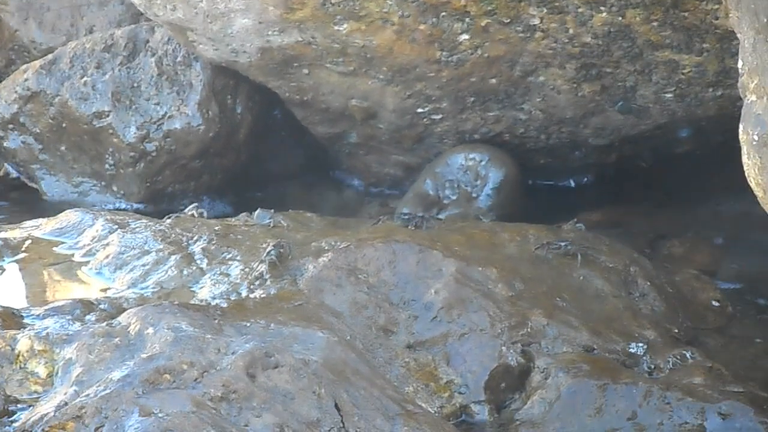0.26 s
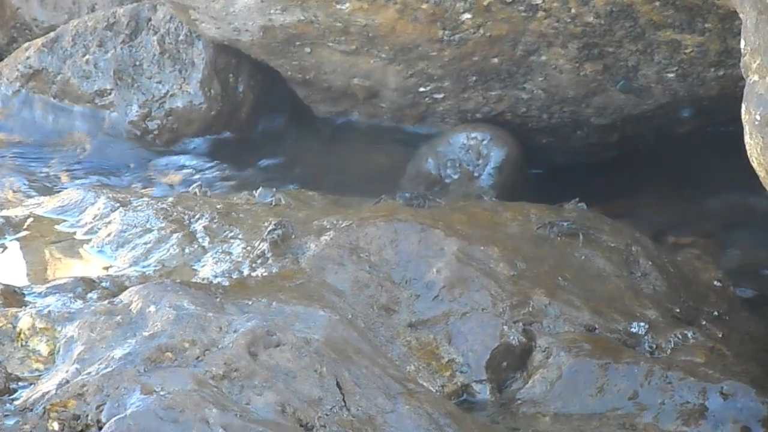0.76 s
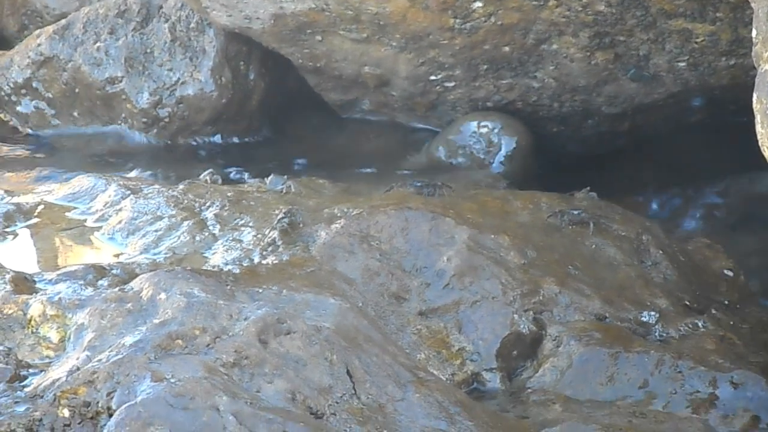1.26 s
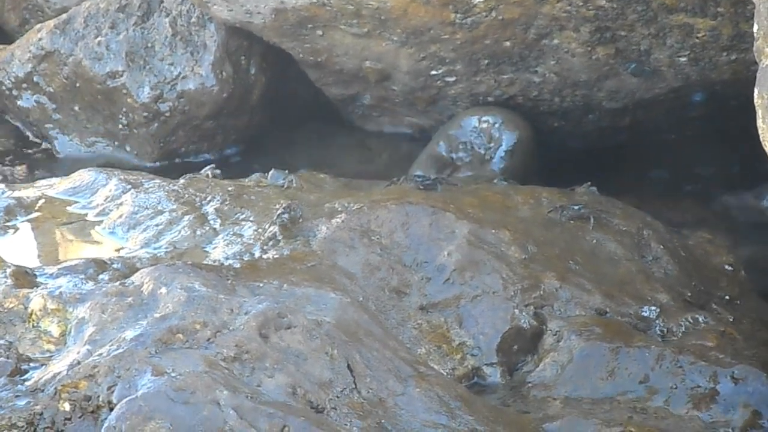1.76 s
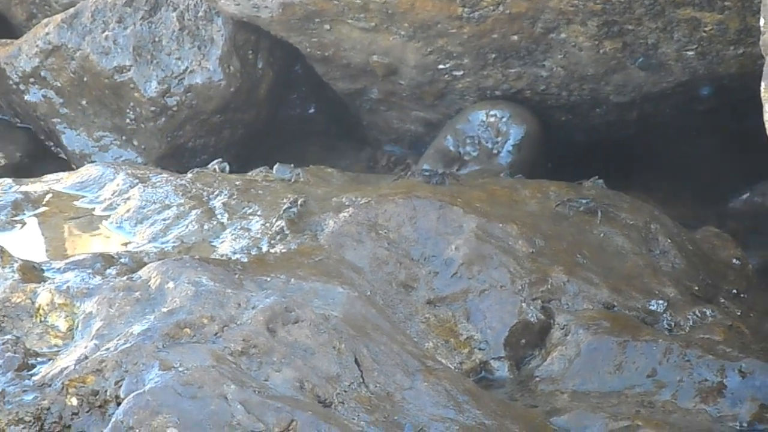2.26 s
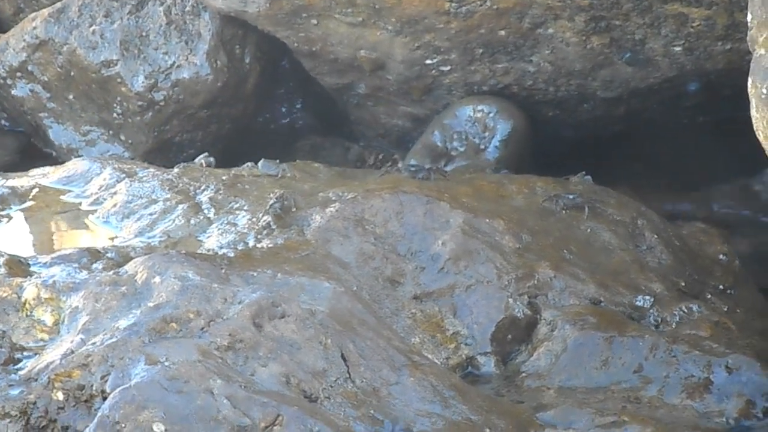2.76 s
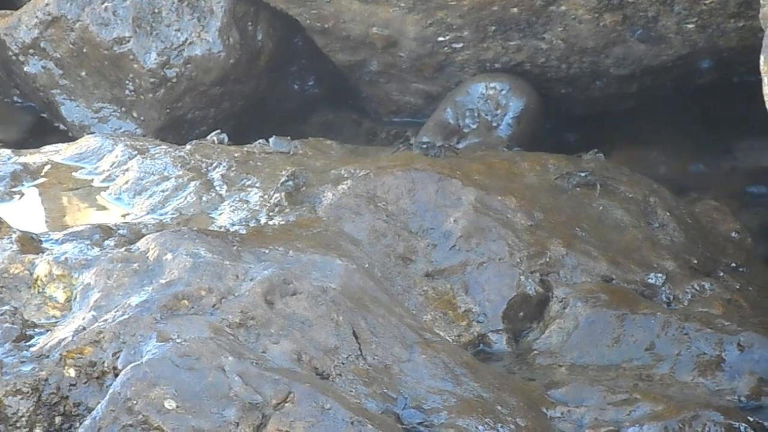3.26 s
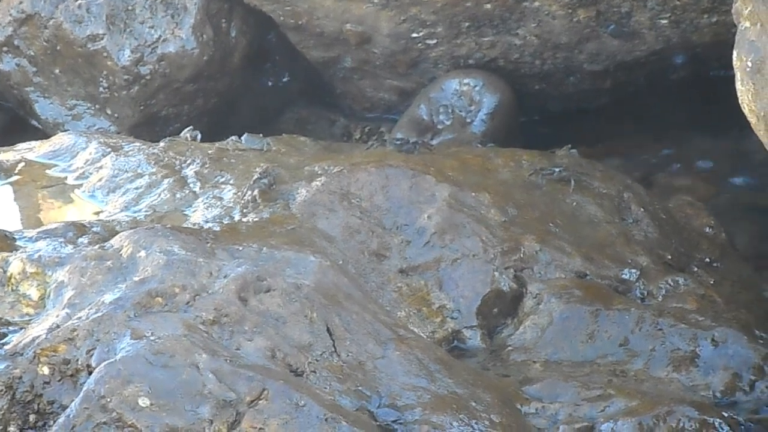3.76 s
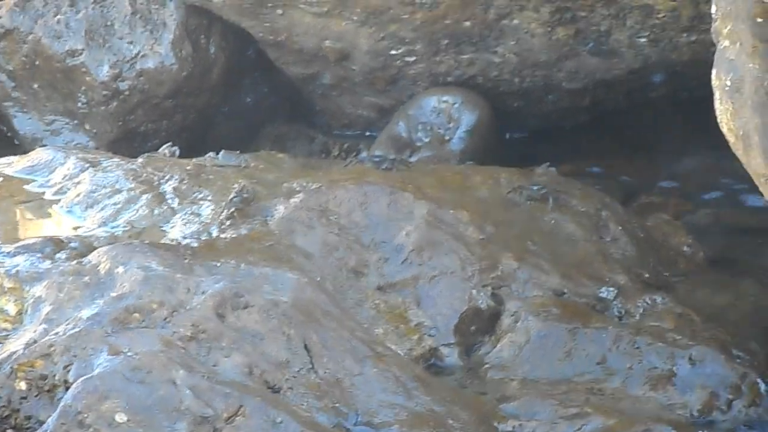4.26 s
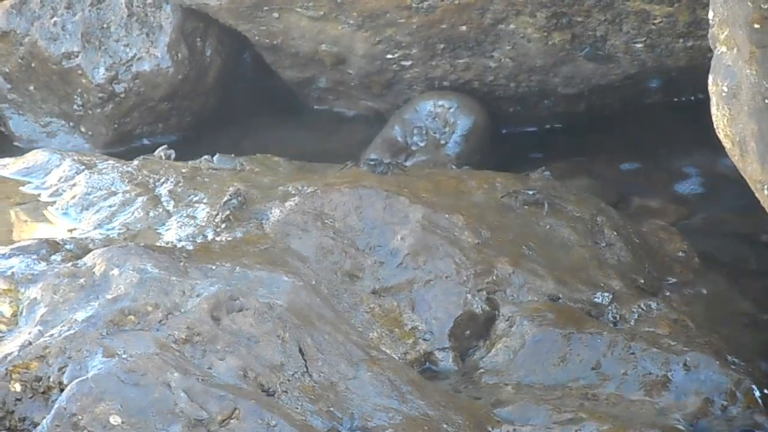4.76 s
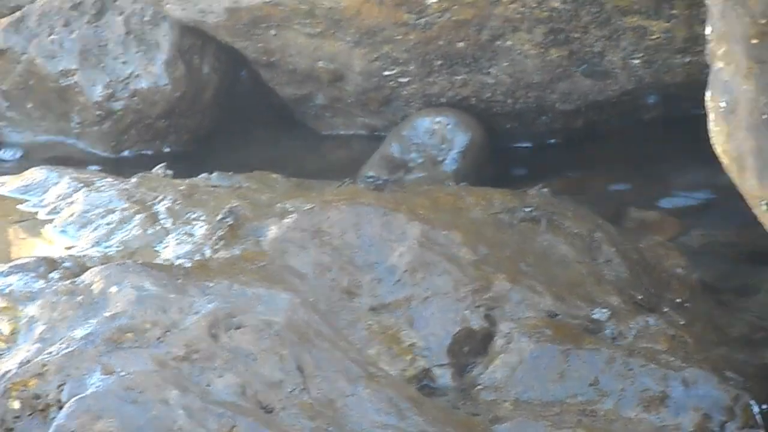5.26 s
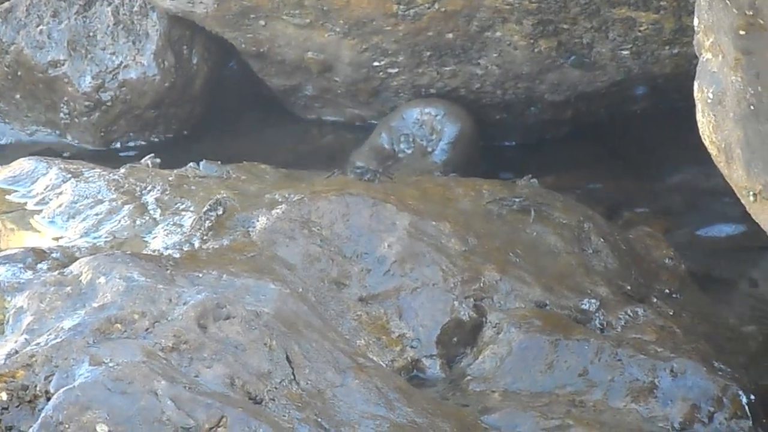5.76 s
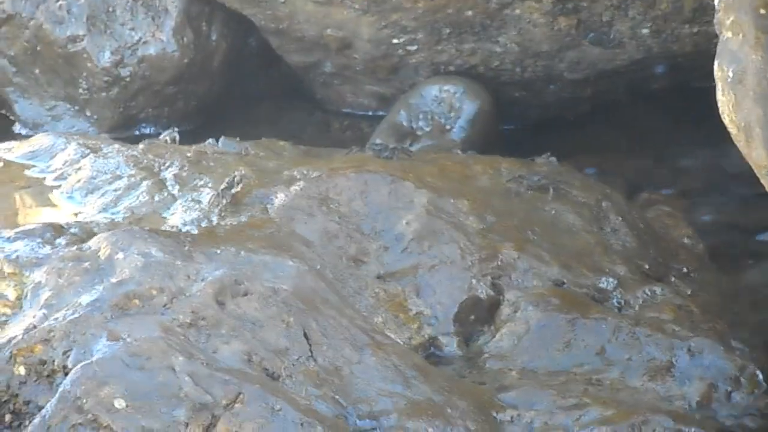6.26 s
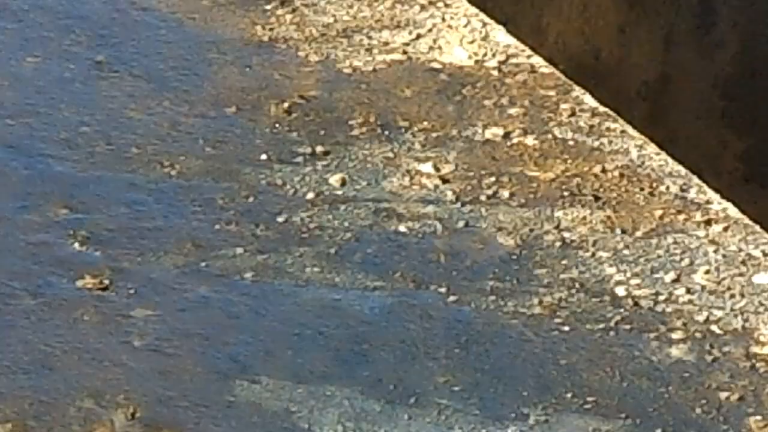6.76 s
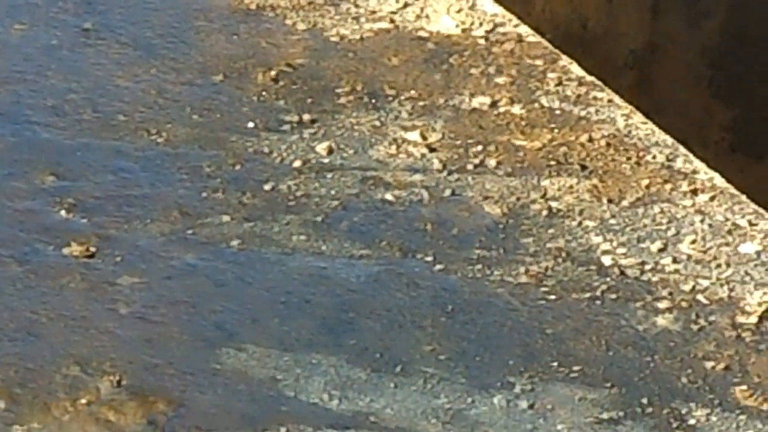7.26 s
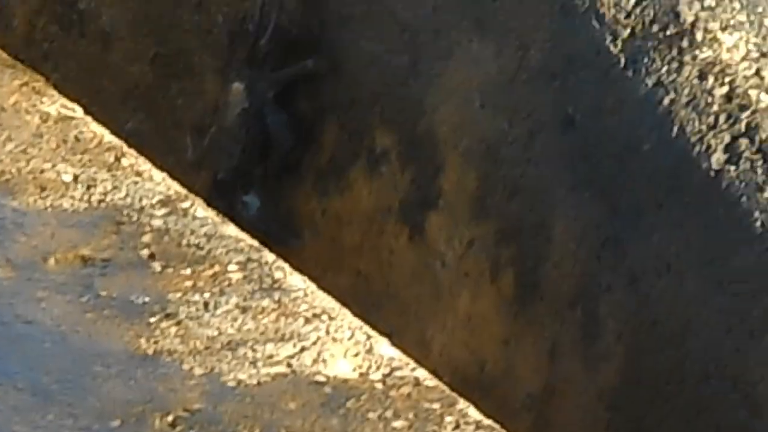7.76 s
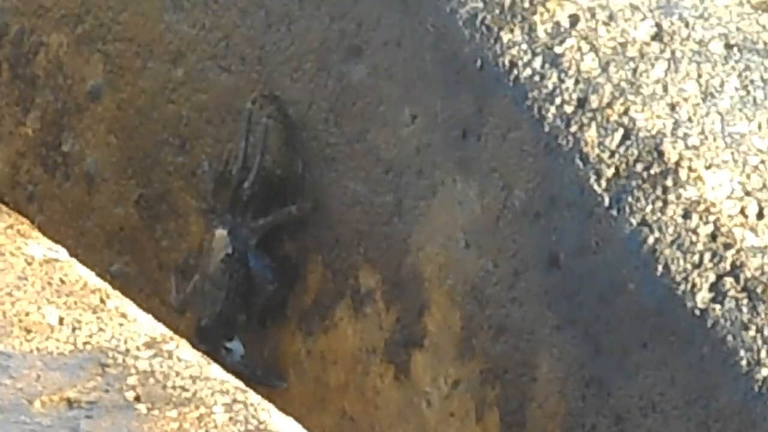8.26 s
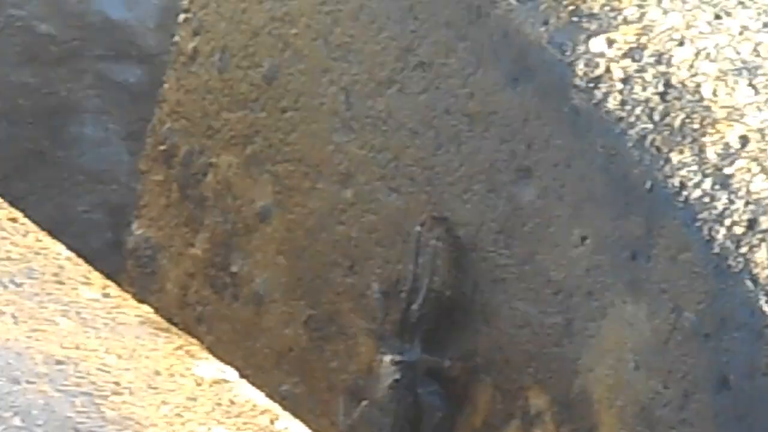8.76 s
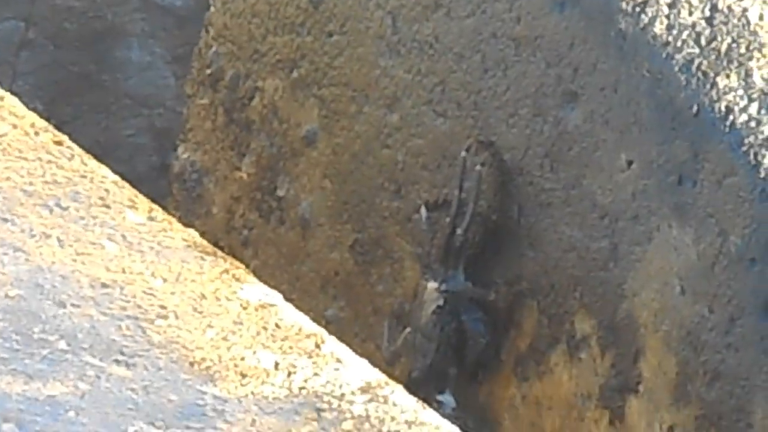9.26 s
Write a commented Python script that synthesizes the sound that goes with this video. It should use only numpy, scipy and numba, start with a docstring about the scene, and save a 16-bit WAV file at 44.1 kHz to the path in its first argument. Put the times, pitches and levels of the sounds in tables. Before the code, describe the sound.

Small sea waves among shoreline rocks, heard close up in mono, with short stony echoes and a soft rolled-off top. At 0 s a wave is ebbing from a gap between boulders: foamy, bubbling wash that thins over two seconds to a quiet trickle. Bright drips cluster at 1.0-1.3 s and near 1.9 s; hollow gulps plop at 2.3 s and repeatedly from 2.8 to 4.0 s over small surges. Wavelets slap the rock around 4.4-4.6 s, then from about 4.7 s a swell fills the gap with rounder, deeper gurgling, with strong plops at 5.8-6.3 s. At 6.84 s the sound dips almost to silence for a moment. A louder, denser, brighter rush over a stone slab follows, lapping unevenly, with crisp slaps around 7.2-7.8 s, sharp drips at 8.3 s, a big plop at 8.5 s and tumbling water towards 9.5 s. A low rumble and faint drone lie behind.

```python
"""Small sea waves wash a rocky shore: water drains and gurgles in a gap between boulders, then a swell fills it.
After a brief dip in level a louder wash runs over a stone slab.
The water is a swarm of ringing air bubbles over fine foam noise; single bubbles plop, wavelets slap, drops spatter.
Close rock faces echo the plops and slaps; a low rumble and a faint far drone lie behind.
Mono, as at a single microphone: both channels are the same."""
import sys
import numpy as np
from scipy import signal
from scipy.fft import rfft, irfft, next_fast_len
from scipy.io import wavfile
from numba import njit

SR = 44100
rng = np.random.default_rng(int(sys.argv[2]) if len(sys.argv) > 2 else 0)


def wrap_up_sound(samples):
    """Save the sound to the file named by the first command line argument, as 16-bit audio."""
    columns = np.atleast_2d(samples).T
    # keep every value between -1 and 1, then stretch to whole-number steps
    tamed = np.clip(columns, -1, 1)
    steps = np.round(tamed * 32767).astype(np.int16)
    wavfile.write(sys.argv[1], SR, steps)


N = 419391
TIME = np.arange(N) / SR
BREAK_S, BREAK_HALF_S = 6.842, .04   # the dip between gap and slab: centre and half length


def from_db(db):
    """Decibels to gain."""
    return 10 ** (np.asarray(db) / 20)


def rms_one(x):
    """Scale to rms 1."""
    return x / np.sqrt(np.mean(x ** 2) + 1e-20)


def add(out, s, sound):
    """Mix a sound in, starting at s seconds."""
    at = max(round(s * SR), 0)
    out[at:at + len(sound)] += sound[:max(N - at, 0)]


def cut(x, hz, kind, order=2):
    """Butterworth low- or high-pass."""
    return signal.sosfilt(signal.butter(order, min(hz, .45 * SR), kind, fs=SR, output="sos"), x)


def band(water, low_hz, high_hz):
    """Up to half a second of water noise from a random moment, between two edges."""
    piece = water[rng.integers(N // 2):][:SR // 2]
    return cut(cut(piece, low_hz, "high", order=4), high_hz, "low", order=4)


def colour(x, points):
    """Give a white sound a spectrum with a causal minimum-phase filter; rms 1."""
    hz, db = np.transpose(points)
    size = next_fast_len(N)
    grid = np.maximum(np.abs(np.fft.fftfreq(size, 1 / SR)), 1)
    log_gain = np.log(from_db(np.interp(np.log(grid), np.log(hz), db)))
    response = np.exp(np.conj(signal.hilbert(log_gain)))[:size // 2 + 1]
    return rms_one(irfft(rfft(x, size) * response, size)[:N])


def drift(rate):
    """Smooth random wandering with spread 1: noise below about rate Hz, drawn at every 40th sample."""
    r = np.exp(-80 * np.pi * rate / SR)
    noise = rng.standard_normal(N // 40 + 2002)
    slow = signal.lfilter([1], [1, -2 * r, r * r], noise)[2000:]   # drop the filter's settling
    return np.interp(np.arange(N) / 40, np.arange(len(slow)), rms_one(slow))


def pops(per_s, spread_db):
    """Clicks at random moments, many small and a few large; rms 1."""
    when, force, sign = rng.random((40000, 3))[:int(per_s * N / SR) + 1].T
    sizes = from_db(spread_db * np.minimum(-np.log(force), 4)) * np.sign(sign - .5)
    return rms_one(np.bincount((when * N).astype(int), sizes, N))


@njit
def ring(rows, rise):
    """Each bubble (s, Hz, gain, cycles to -60 dB) is a dying sine whose pitch rises as it nears the surface."""
    out = np.zeros(N)
    for s, hz, gain, cycles in rows:
        at = int(s * SR)
        length = int(SR * cycles / hz) + 1
        angle = 2 * np.pi * hz / SR
        swing = gain + 0j
        step = np.exp(1j * angle - np.log(1000) / length)
        glide = np.exp(2j * angle * rise / length)   # the pitch ends up by twice the share "rise"
        for i in range(min(length, N - at)):
            out[at + i] += swing.imag * min(i * angle / np.pi, 1.)   # the first half cycle builds up
            swing *= step
            step *= glide
    return out


def rocks(x, echo_db, t60=0.092, dull_hz=6000):
    """Close stone faces scatter a short, duller tail after a sound; every call draws its own echoes."""
    t = TIME[:SR // 5]
    tail = cut(rng.standard_normal(len(t)), dull_hz, "low", order=1)
    tail = tail * from_db(-60 * t / t60) * (t > .002)
    return x + from_db(echo_db) * signal.fftconvolve(x, tail / np.linalg.norm(tail))[:len(x)]


# Low rumble of the open shore: (frequency [Hz], relative level [dB per Hz])
RUMBLE_COLOUR = [(20, -27), (35, -17.5), (60, -8.5), (110, -6.5), (200, -5), (400, -18)]
# Faint far drone: (frequency [Hz], level [dB rms])
DRONE_TONES = [(91.5, -65), (137.5, -65), (229, -60.5)]


def shore(rumble_db=-58, thump_db=-4, waver=0.37):
    """Coloured noise rumbles unevenly, low-passed clicks thump under the boulders, sines waver in phase (rad)."""
    lumps_db = 1.8 * drift(7)
    thumps = from_db(thump_db) * cut(pops(per_s=12, spread_db=3.0), 160, "low")
    ground = cut(rng.standard_normal(N), 400, "low") + thumps
    out = colour(ground, RUMBLE_COLOUR) * from_db(rumble_db + lumps_db)
    for hz, db in DRONE_TONES:
        phase = 2 * np.pi * hz * TIME + waver * drift(1.9)
        out = out + from_db(db) * np.sqrt(2) * np.sin(phase)
    return out


# Fainter random bubbles in the gap: (rate [per s], base level [dB], spread [dB],
# lowest pitch [Hz], highest pitch [Hz], ring until 60 dB down [cycles])
STRAY_BUBBLES = [(24, -31.5, 0.5, 2450, 6900, 54), (30.2, -32, 2, 697, 3150, 36)]


def strays(rise=0.074, echo_db=-6):
    """Small pips and middling plops ring at random in the gap, up to the dip."""
    rows = []
    for per_s, base_db, spread_db, low_hz, high_hz, cycles in STRAY_BUBBLES:
        for when, size, force in rng.random((500, 3))[:int(per_s * BREAK_S)]:
            hz = low_hz * (high_hz / low_hz) ** size
            gain = from_db(base_db + spread_db * (2 * force - 0.5))
            rows.append((when * BREAK_S, hz, gain, cycles))
    return rocks(ring(np.array(rows), rise), echo_db)


def plop(hz, cycles, rise=0.045, top_hz=9000, snap_db=-15, snap_s=.001, swell_cycles=1.0):
    """A bubble pinches off with a small snap, swells over about a cycle and rings out with rising pitch."""
    t = TIME[:SR // 5]
    tone = ring(np.array([[0., hz, 1., cycles]]), rise)[:len(t)]
    tone = tone * (1 - np.exp(-t * hz / swell_cycles))
    hiss = cut(rng.standard_normal(len(t)), hz / 2, "high")
    hiss = rms_one(cut(hiss, min(2 * hz, top_hz), "low", order=3))
    snap = from_db(snap_db) * min(hz / 3000, 1) * hiss * np.exp(-t / snap_s)   # low plops snap less
    return rocks(tone / np.abs(tone).max() + snap, echo_db=-7.5)


# Large air pockets gulping under the boulders: (time [s], peak of the bare tone [dB], starting pitch [Hz])
GULP_BUBBLES = [(0.086, -32, 225), (1.028, -27, 1040), (1.122, -25, 755), (1.86, -31, 644),
                (2.265, -22, 624), (2.766, -25.5, 1050), (2.78, -29, 530), (2.899, -24, 1210),
                (2.946, -24, 730), (3.284, -27, 740), (3.375, -27, 1240), (3.461, -27, 690),
                (3.588, -27, 900), (4.003, -27, 536), (4.016, -21, 793), (5.82, -22, 640),
                (6.039, -18, 994), (6.249, -20, 1210), (8.505, -13.5, 974)]
# Drops that fall into the pool and trap a small bubble: (time [s], peak of the bare tone [dB], starting pitch [Hz])
DRIP_BUBBLES = [(0.334, -16, 2660), (1.066, -21, 4760), (1.103, -23.5, 3440), (1.1443, -15, 6050),
                (1.214, -22, 2370), (1.218, -19.5, 2650), (1.231, -25, 2620), (1.251, -23, 2070),
                (1.853, -20, 2040), (1.886, -22, 3820), (1.991, -25.5, 1870), (2.901, -22, 2220),
                (2.971, -22, 1700), (3.701, -27, 4100), (4.013, -20, 3560), (4.366, -16.5, 1750),
                (4.615, -17, 1720), (4.8703, -22, 2530), (4.873, -18.5, 3070), (5.339, -17, 3520),
                (8.28, -12.5, 4460), (8.345, -10, 6200)]
GULP_CYCLES, DRIP_CYCLES = 29, 29   # ring until 60 dB down


def plops():
    """Deep gulps and bright drips, each one ringing bubble."""
    out = np.zeros(N)
    for s, peak_db, hz in GULP_BUBBLES:
        add(out, s, from_db(peak_db) * plop(hz, GULP_CYCLES))
    for s, peak_db, hz in DRIP_BUBBLES:
        add(out, s, from_db(peak_db) * plop(hz, DRIP_CYCLES))
    return out


def swarm(per_s, spread_db, cycles, rise, clump_db, clump_s=.012, count=8):
    """Each ripple traps a clump of bubbles of like size; gain grows with pitch to keep the whole near white; rms 1."""
    chance = rng.random((int(per_s / count * N / SR), count + 1, 5))
    when, size, vigour = np.repeat(chance[:, 0, :3], count, axis=0).T   # shared within a clump
    delay, detune, force, life, sign = chance[:, 1:].reshape(-1, 5).T   # one per bubble
    low_root, high_root = np.sqrt(130), np.sqrt(11500)
    clump_hz = (low_root + size * (high_root - low_root)) ** 2
    hz = clump_hz * 2 ** (detune - .5)
    level_db = spread_db * np.minimum(-np.log(force), 4) + clump_db * np.minimum(-np.log(vigour), 3)
    gain = hz ** .75 * from_db(level_db) * np.sign(sign - .5)
    born = when * N / SR - abs(clump_s) * np.log(delay)
    lasts = cycles * (.5 + life) * (hz / 1000) ** 0.26   # small bubbles ring for more cycles
    return rms_one(ring(np.column_stack([born, hz, gain, lasts]), rise))


def burst(water, level_db, length, attack_share=0.17):
    """Water noise that swells quickly and dies away over a decay time (s); the level is the crest's rms."""
    t = TIME[:SR // 3]
    envelope = (1 - np.exp(-t / (attack_share * length))) * np.exp(-t / length)
    return from_db(level_db) * rms_one(water[:len(t)] * envelope) / rms_one(envelope).max()


# Wavelets slapping the rock: (time [s], crest level before echo [dB], decay time [s], upper band edge [Hz])
ROCK_SLAPS = [(0.023, -32, 0.065, 4470), (1.852, -24, 0.0031, 4540), (1.879, -35.5, 0.046, 1690),
              (2.261, -30, 0.05, 2220), (2.803, -30, 0.014, 3400), (3.46, -26.5, 0.005, 6100),
              (3.995, -29, 0.028, 1900), (4.358, -29.5, 0.015, 6000), (4.53, -32.5, 0.06, 4000),
              (4.564, -24, 0.035, 4750), (4.607, -27, 0.015, 4700), (5.771, -27.5, 0.044, 1920),
              (5.82, -25, 0.014, 2200), (7.233, -24, 0.008, 4000), (7.478, -22, 0.012, 3800),
              (7.496, -16.5, 0.0045, 5000), (7.839, -21, 0.008, 3020)]
# Spray spattering on stone: (time [s], crest level before echo [dB], decay time [s], band centre [Hz])
STONE_SPATTERS = [(0.799, -30.5, 0.0074, 7400), (1.14, -27, 0.0061, 5100), (1.471, -28, 0.004, 6400),
                  (1.882, -24.5, 0.0043, 3340), (3.692, -34.5, 0.014, 4100), (3.991, -26.5, 0.007, 4880),
                  (4.222, -35, 0.0082, 7060), (4.703, -33, 0.045, 3840), (5.3375, -24.5, 0.0018, 5300),
                  (8.03, -19.5, 0.0022, 7400), (8.92, -17.5, 0.0047, 5500)]


def slaps(low_hz=430, spatter_width=1.03, foam_db=-3, drops_db=-5):
    """A wavelet hits stone and bursts into bubbles, foam and crisp drops; spray spatters in narrow bands."""
    out = np.zeros(N)
    bubbles = swarm(per_s=7100, spread_db=-3, cycles=25, rise=0.11, clump_db=-1)
    foam = from_db(foam_db) * rng.standard_normal(N)
    drops = from_db(drops_db) * pops(per_s=650, spread_db=2.5)
    splash = bubbles + foam + drops
    for s, level_db, length, bright_hz in ROCK_SLAPS:
        slap = burst(band(splash, low_hz, bright_hz), level_db, length)
        add(out, s, rocks(slap, echo_db=-6.5))
    for s, level_db, length, hz in STONE_SPATTERS:
        spatter = burst(band(splash, hz / spatter_width, hz * spatter_width), level_db, length)
        add(out, s, rocks(spatter, echo_db=-4.5))
    return out


# Water folding over in the wash: (crest time [s], crest level [dB] before the bell shape is applied,
# half length [s], band centre [Hz])
WASH_TUMBLES = [(0.057, -28.5, 0.046, 800), (0.408, -31.5, 0.038, 880), (6.68, -33, 0.053, 940),
                (6.908, -30.5, 0.028, 288), (7.772, -25, 0.027, 720), (7.85, -30.5, 0.022, 480),
                (7.983, -30.5, 0.034, 450), (8.87, -22.5, 0.025, 890), (9.346, -25, 0.025, 950),
                (9.46, -22.5, 0.022, 840), (9.466, -34, 0.018, 303)]


def tumbles(bubbles, width=1.23):
    """Water folds over and traps a cloud of bubbles of like size, which swells and fades as a bell curve."""
    out, t = np.zeros(N), TIME[:SR // 2]
    for s, level_db, length, hz in WASH_TUMBLES:
        start = max(s - t.mean(), 0)
        cloud = rms_one(band(bubbles, hz / width, hz * width))
        bell = np.exp(-.5 * ((start + t - s) / length) ** 2)
        add(out, start, from_db(level_db) * cloud * bell)
    return out


def droplets(per_s, spread_db, patchy_db=1.5, cycles=17, low_hz=2400, high_hz=10500, rise=0.15):
    """Falling droplets each trap a tiny bubble that pips for a few cycles; flurries swell and thin; rms 1."""
    when, size, force = rng.random((20000, 3))[:int(per_s * N / SR)].T
    hz = low_hz + size * (high_hz - low_hz)
    gain = hz ** .5 * from_db(spread_db * np.minimum(-np.log(force), 4))
    lasts = np.full(len(hz), 1. * cycles)
    pips = ring(np.column_stack([when * N / SR, hz, gain, lasts]), rise)
    return rms_one(pips * from_db(2 * patchy_db * np.tanh(drift(14) / 2)))


# The last wave ebbs out of the gap until only a trickle is left; spray levels are relative to churn.
# All flow levels here and in the two tables below are before the trims in waves().
EBB_DB, EBB_DB_PER_S, EBB_SPRAY_DB = -26.5, 10.5, -3.5
TRICKLE_DB, TRICKLE_SPRAY_DB = -38, -3.5
SURGE_RISE_S = 0.23
# Surges that push into the gap: (crest time [s], churn level [dB], spray level [dB], ebb [dB per s])
GAP_SURGES = [(1.13, -36.5, -56, 41), (2.82, -34.5, -40.5, 16.5), (3.94, -37.5, -42, 70),
              (4.66, -31.5, -35.5, 67), (5.3, -32.5, -41, 16), (5.83, -33, -32.5, 3.5),
              (6.68, -35, -32.5, 20)]


def gap_flow():
    """Churn and spray in dB: powers of ebb, trickle and surges add; each surge swells to a crest and drains."""
    ebb = from_db(EBB_DB - EBB_DB_PER_S * TIME) * from_db([[0], [EBB_SPRAY_DB]])
    trickle = from_db(TRICKLE_DB) * from_db([[0], [TRICKLE_SPRAY_DB]])
    power = ebb ** 2 + trickle ** 2
    for s, churn_db, spray_db, ebb_db_per_s in GAP_SURGES:
        swelling = np.exp(np.minimum(TIME - s, 0) / SURGE_RISE_S)
        draining = from_db(-ebb_db_per_s * np.maximum(TIME - s, 0))
        power = power + (from_db([[churn_db], [spray_db]]) * swelling * draining) ** 2
    return 10 * np.log10(power)


# Water running over the slab: (time [s], churn level [dB], spray level [dB])
SLAB_LEVELS = [(6.9, -25, -23.5), (7.06, -21.5, -22), (7.35, -24, -22.5), (7.62, -23, -23),
               (7.8, -21.5, -25), (8.02, -22.5, -24.5), (8.12, -25.5, -25.5), (8.62, -24.5, -25),
               (9.1, -23, -23), (9.45, -22, -22.5)]


def slab_flow():
    """Churn and spray on the slab in dB, joined by straight lines."""
    s, *levels = np.transpose(SLAB_LEVELS)
    return [np.interp(TIME, s, db) for db in levels]


def wash(flow, spectrum, sparse, dense, ticks, foam_db, churn_gain_db, spray_gain_db, split_hz=2500, lap_db=.55):
    """Bubbles and drops over smooth foam; churn drives the low part, spray the high part, and both lap unevenly."""
    churn_db, spray_db = flow
    crowding = np.interp(churn_db, [-34, -29], [0, 1])   # stronger flow packs the bubbles closer
    bubbles = np.sqrt(1 - crowding) * sparse + np.sqrt(crowding) * dense
    foam = from_db(foam_db) * rng.standard_normal(N)
    water = colour(bubbles + ticks + foam, spectrum)
    churn = rms_one(cut(water, split_hz, "low", order=3)) * from_db(churn_db + churn_gain_db)
    spray = rms_one(cut(water, split_hz, "high", order=3)) * from_db(spray_db + spray_gain_db)
    return (churn + spray) * from_db(lap_db * drift(22))


def roll(water, depth_db=1.67, rate=11, low_hz=180, high_hz=900, count=5):
    """Hollows of different sizes open and close in the rushing water, so its resonances keep shifting."""
    for hz in np.geomspace(low_hz, high_hz, count):
        hollow = signal.lfilter(*signal.iirpeak(hz, 2, fs=SR), water)
        water = water + (from_db(depth_db * np.clip(drift(rate), -2, 2)) - 1) * hollow
    return water


# Colour of the gap as it drains: (frequency [Hz], relative level [dB per Hz])
DRAINING_COLOUR = [(60, -39), (150, -20.5), (220, -10.5), (280, -8.5), (400, -6), (560, -3.5), (1100, -2.5),
                   (1430, -6.5), (1750, -3.5), (3200, -7), (6300, -11.5), (9000, -18), (10500, -33)]
# Colour of the gap as the swell fills it: (frequency [Hz], relative level [dB per Hz])
FILLING_COLOUR = [(60, -46), (150, -14), (220, -8), (350, -5), (500, 0.5), (620, 3.5), (900, 1),
                  (1280, 0.5), (1450, -5.5), (1800, -2), (2050, -6), (2300, -4), (2700, -10), (3800, -15.5),
                  (7500, -21.5), (9700, -30.5), (10500, -46.5)]
# Colour of the wash over the slab: (frequency [Hz], relative level [dB per Hz])
STONE_SLAB_COLOUR = [(60, -46), (130, -19.5), (220, -11.5), (350, -6.5), (590, -6.5), (790, 1), (1200, -2),
                     (2400, -4.5), (2800, -7), (4300, -5.5), (7600, -13.5), (9700, -21), (10600, -36.5)]
SWELL_START_S, SWELL_FULL_S = 4.7, 5.0


def waves():
    """The gap drains and fills again; then comes the denser, smoother rush on the slab."""
    clicks = cut(pops(per_s=260, spread_db=4.0), 1400, "high")
    ticks = droplets(per_s=330, spread_db=3.0) + from_db(-4.5) * clicks
    gurgle = swarm(per_s=2300, spread_db=2.0, cycles=79, rise=0.045, clump_db=0.3)
    froth = swarm(per_s=4500, spread_db=0.0, cycles=64, rise=0.057, clump_db=-0.5)
    gap = gap_flow()
    drain = wash(gap, DRAINING_COLOUR, gurgle, froth, from_db(-7.0) * ticks,
                 foam_db=-0.5, churn_gain_db=1.06, spray_gain_db=1.0)
    swell = wash(gap, FILLING_COLOUR, gurgle, froth, from_db(-12) * ticks,
                 foam_db=2.0, churn_gain_db=1.95, spray_gain_db=2.0)
    slab = wash(slab_flow(), STONE_SLAB_COLOUR, gurgle, froth, from_db(-7.5) * ticks,
                foam_db=1.5, churn_gain_db=0.3, spray_gain_db=-0.56)
    filled = np.interp(TIME, [SWELL_START_S, SWELL_FULL_S], [0, 1])
    gap_water = np.sqrt(1 - filled) * drain + np.sqrt(filled) * swell
    return np.where(TIME < BREAK_S, gap_water, roll(slab)) + tumbles(froth)


def scene():
    """All the layers, from the far shore to the near water, the same in both channels; the level dips briefly."""
    mono = shore() + strays() + plops() + slaps() + waves()
    fade = np.minimum(np.abs(TIME - BREAK_S) / BREAK_HALF_S, 1)
    mono = mono * np.maximum(np.sin(np.pi / 2 * fade) ** 2, .02)
    return np.array([mono, mono])


def record(dry, cutoff_hz=10480):
    """The top is cut steeply by an elliptic low-pass."""
    return signal.sosfilt(signal.ellip(10, .2, 80, cutoff_hz, fs=SR, output="sos"), dry)


dry = scene()
out = record(dry)
wrap_up_sound(out)
```